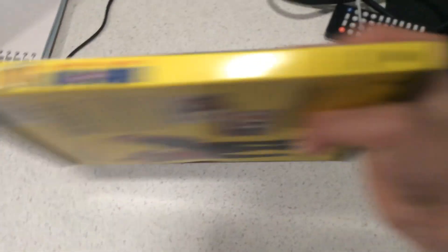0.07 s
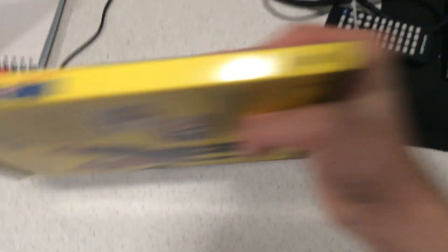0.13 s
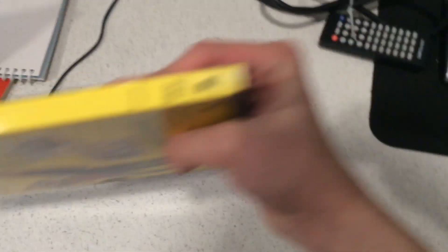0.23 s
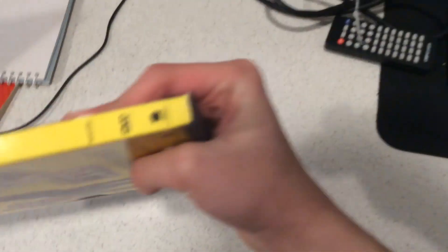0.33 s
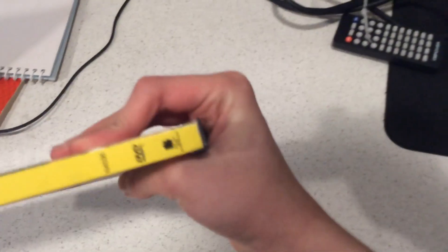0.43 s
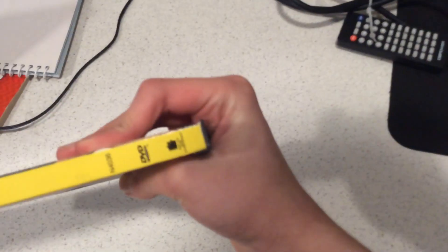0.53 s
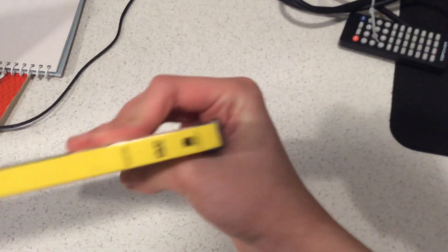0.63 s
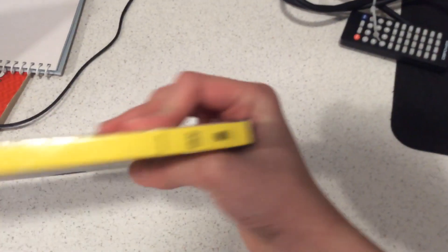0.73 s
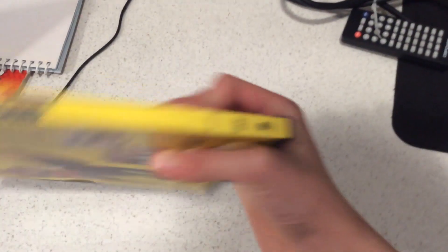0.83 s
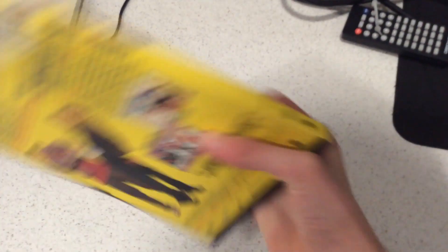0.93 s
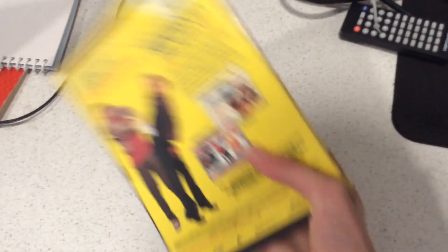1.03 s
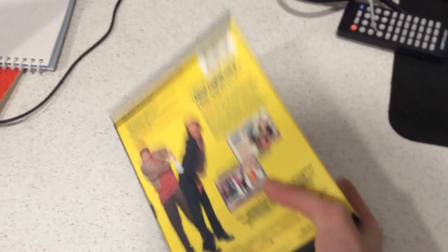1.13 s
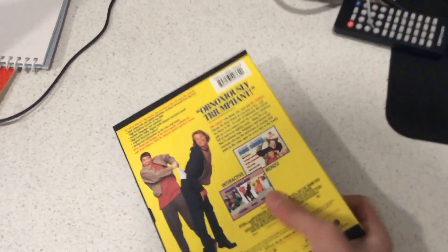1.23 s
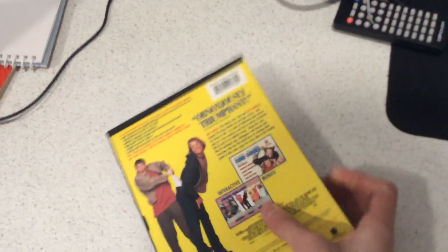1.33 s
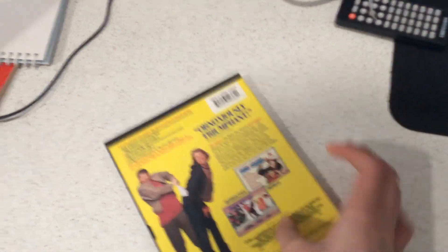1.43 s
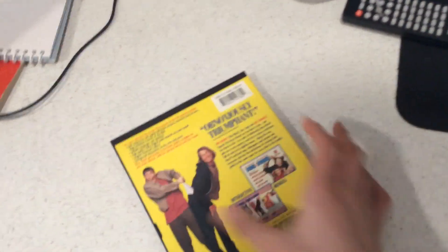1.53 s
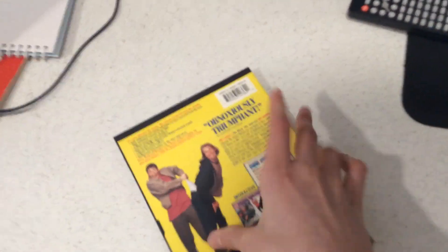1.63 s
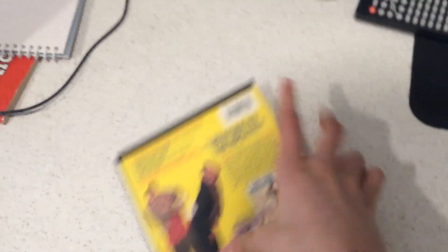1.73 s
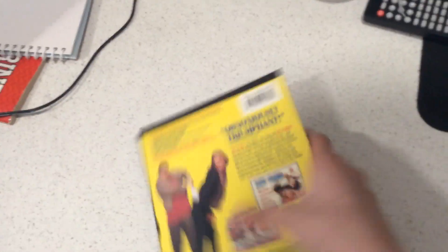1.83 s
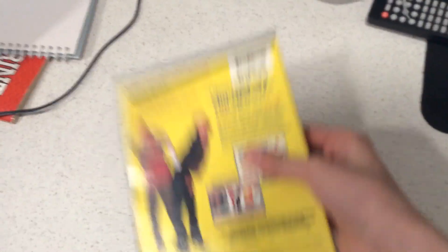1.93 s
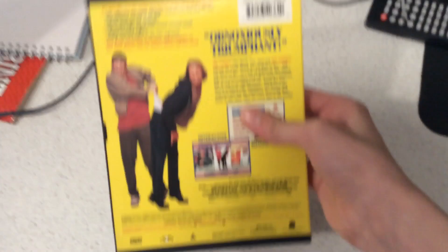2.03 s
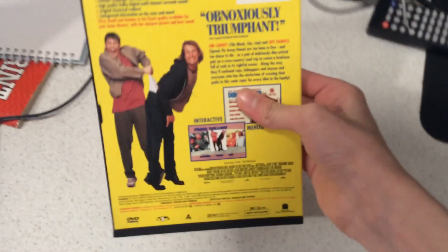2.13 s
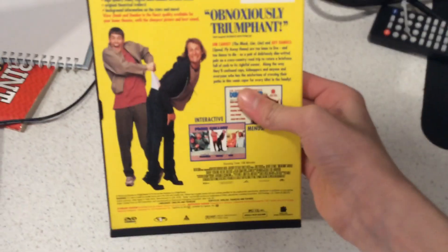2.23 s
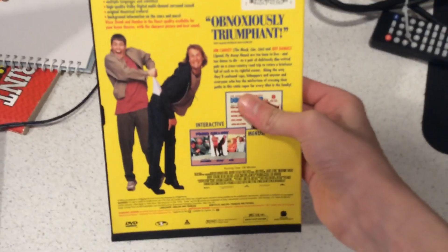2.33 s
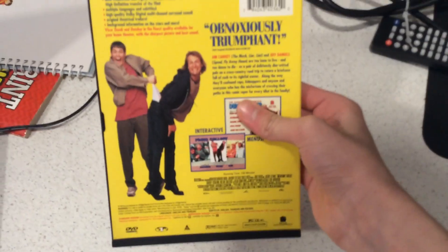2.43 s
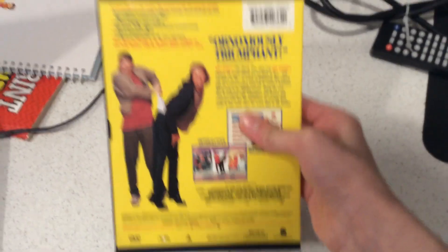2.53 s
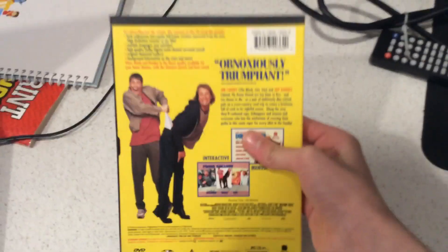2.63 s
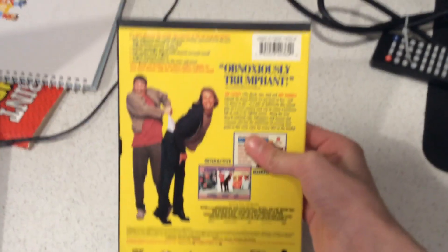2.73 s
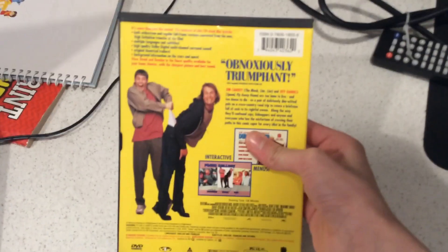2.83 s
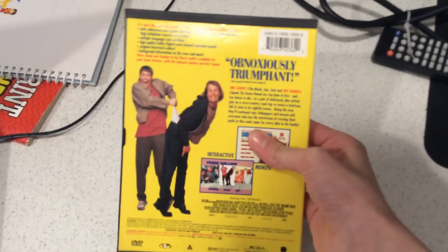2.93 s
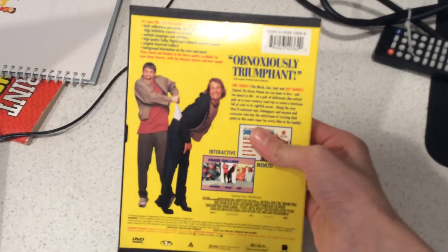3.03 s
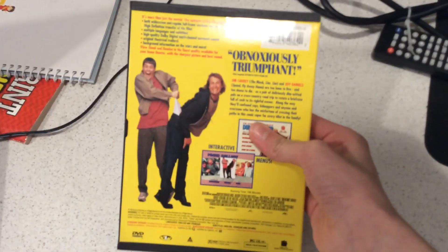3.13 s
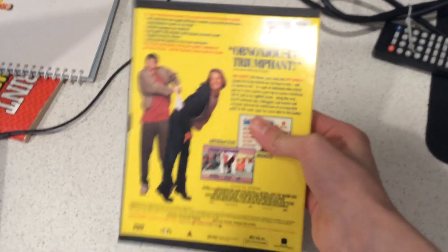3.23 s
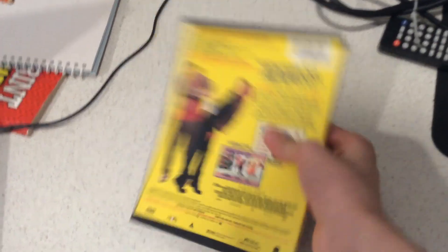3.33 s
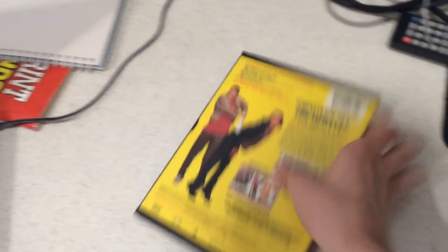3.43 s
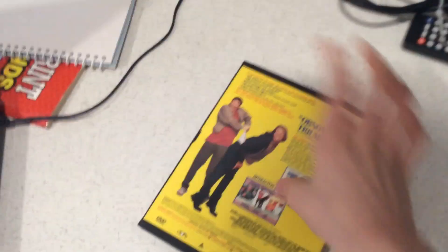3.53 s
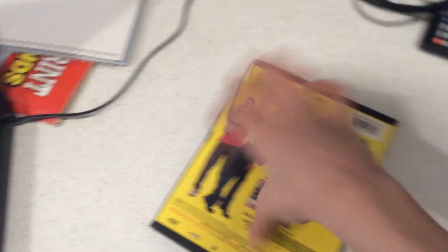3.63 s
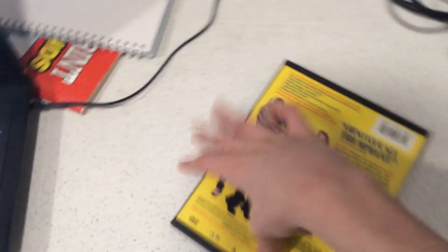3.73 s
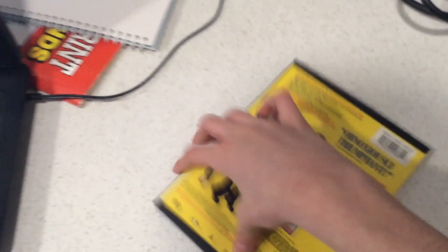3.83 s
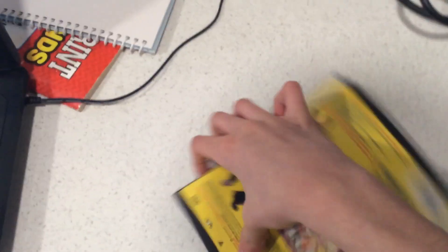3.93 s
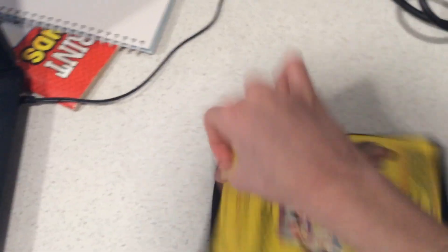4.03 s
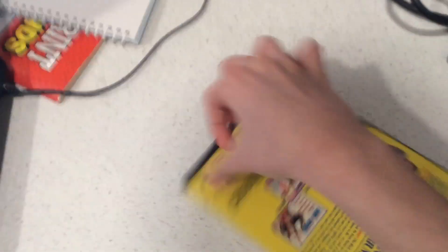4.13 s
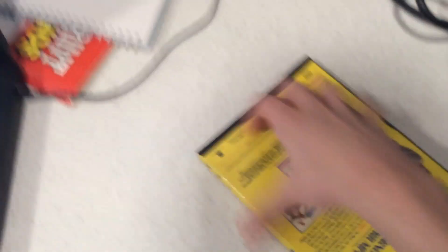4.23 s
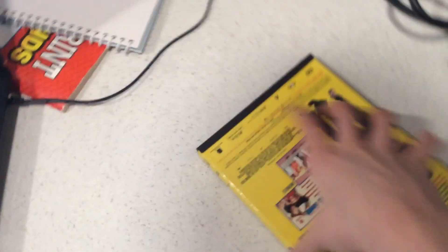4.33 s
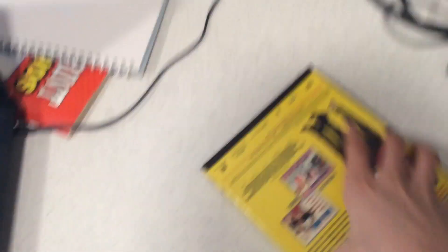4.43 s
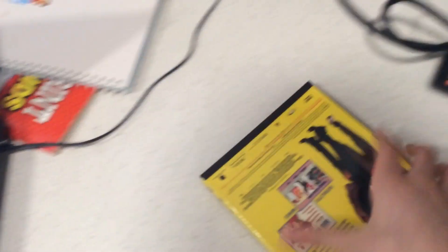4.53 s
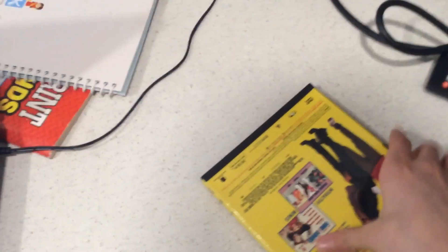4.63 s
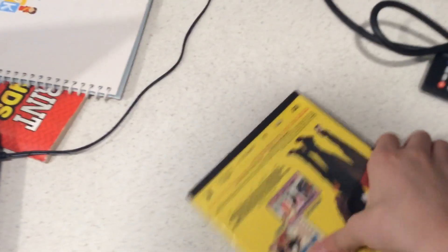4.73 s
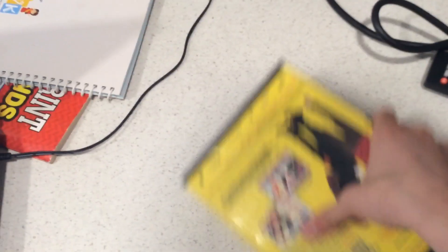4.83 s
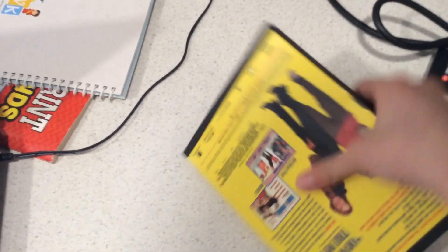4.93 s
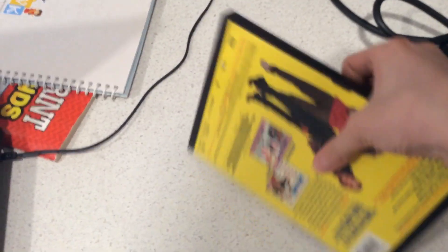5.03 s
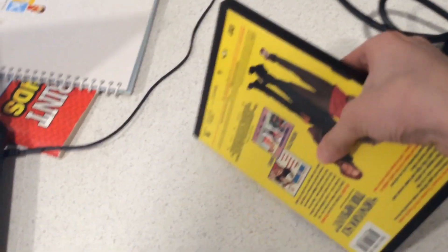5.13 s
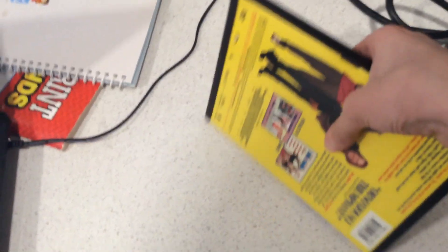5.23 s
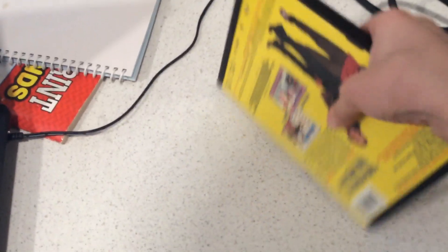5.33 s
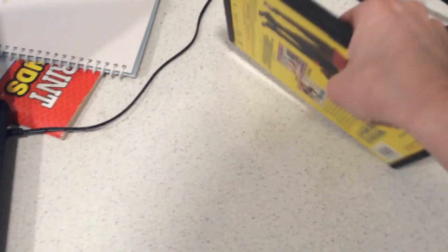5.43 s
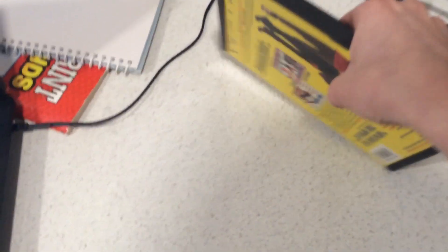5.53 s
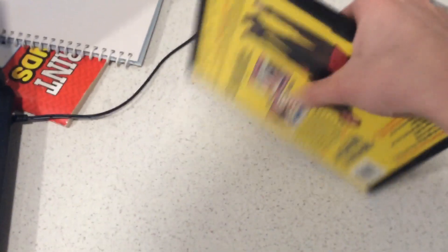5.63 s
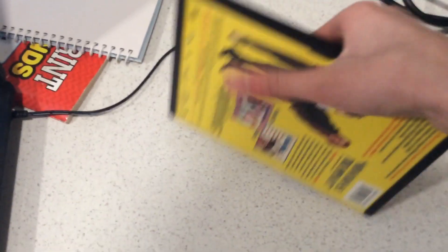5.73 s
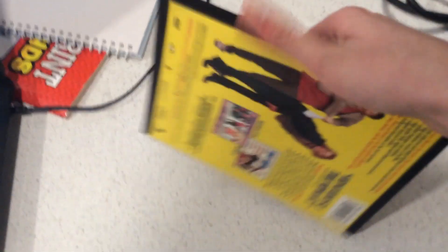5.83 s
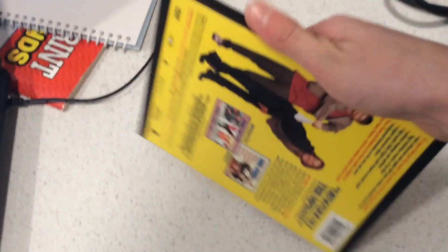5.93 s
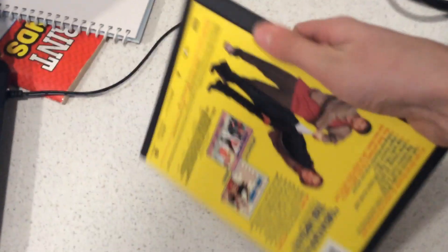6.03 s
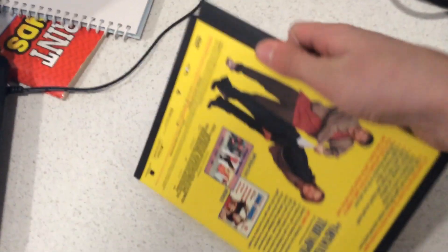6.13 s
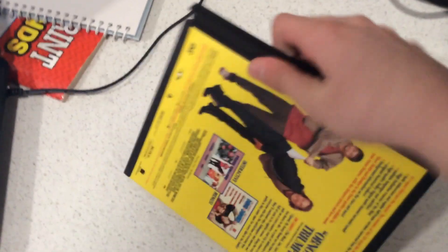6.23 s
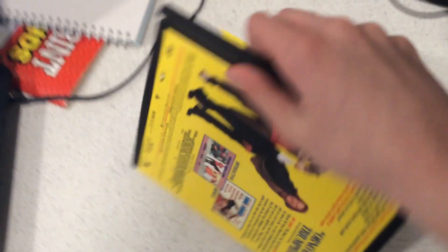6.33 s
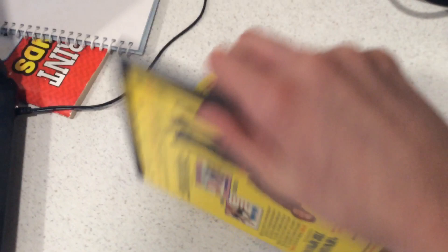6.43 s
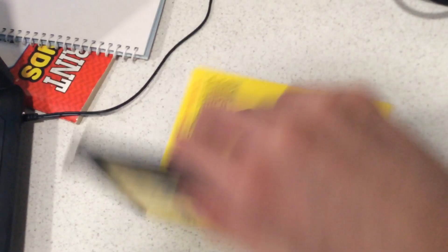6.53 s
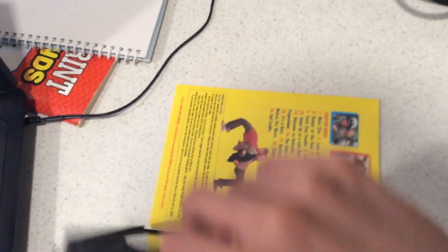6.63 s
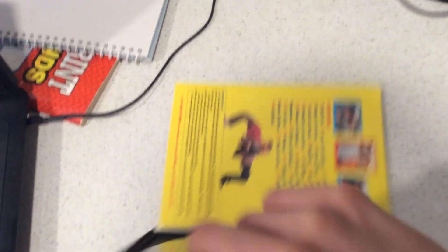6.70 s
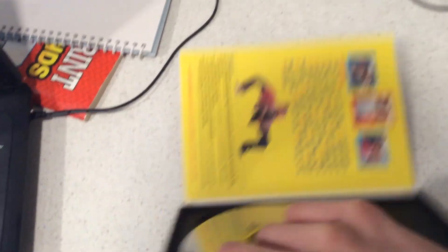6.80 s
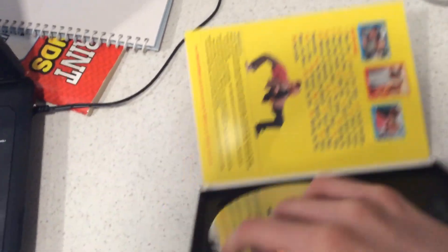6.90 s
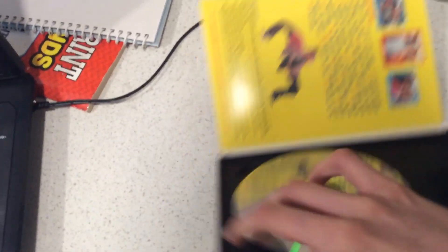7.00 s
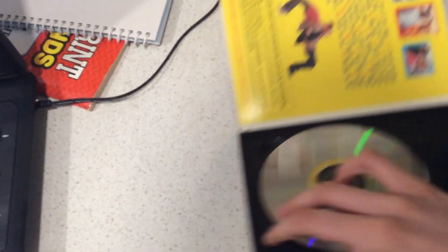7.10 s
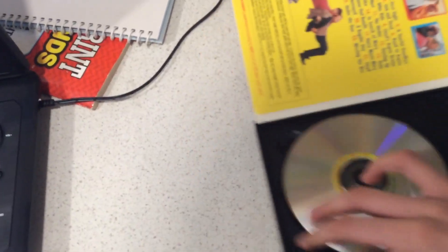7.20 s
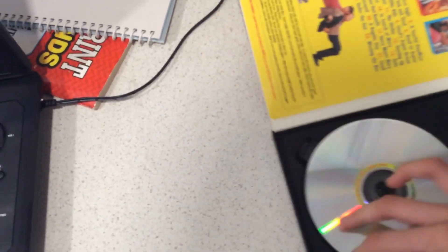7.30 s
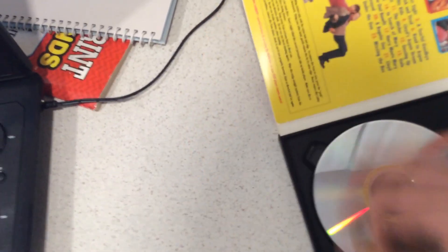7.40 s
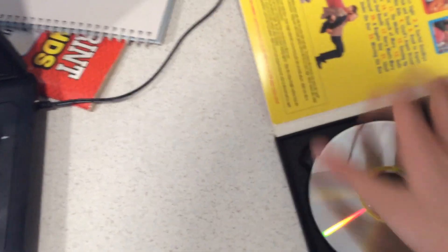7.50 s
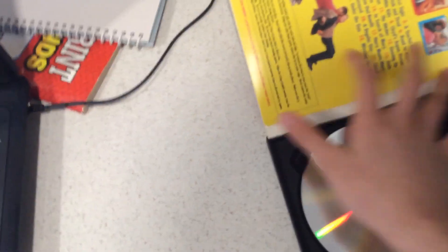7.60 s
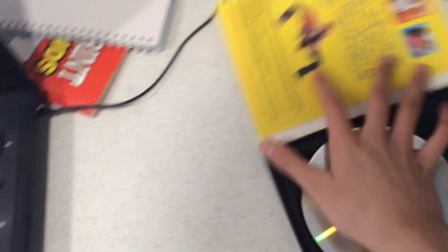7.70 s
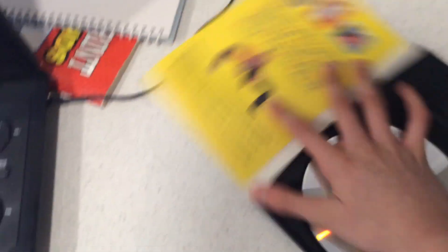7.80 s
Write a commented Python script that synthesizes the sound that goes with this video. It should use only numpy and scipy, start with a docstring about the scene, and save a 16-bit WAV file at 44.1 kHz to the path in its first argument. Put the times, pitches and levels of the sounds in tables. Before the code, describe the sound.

A hand fumbles with a plastic disc case on a hard desk, heard closely with a short dry room echo. Bright catch clicks come in two bursts separated by quiet, then the edge knocks and grinds over the desk. Fingers brush and squeak on the slick cover, the panel flexes with a dull boom, the case pops open, the disc is pressed with a small click, and the case slides.

```python
"""On a desk in a small, quiet room, hands turn over a plastic disc case, pry it open and press the disc on its hub.
Catches and fingertips click: short noise bursts ring through the rim, the hollow shell and the panels.
Fingers hiss and squeak on the sleeve and the edge scrapes the desk: swelling strokes of tiny slips through coloured bodies.
Panels thump in sinking sine modes; soft bumps, low rumble, faint hiss and hum lie underneath."""
import sys
import numpy as np
from scipy import signal
from scipy.fft import rfft, irfft, next_fast_len
from scipy.io import wavfile
from scipy.ndimage import map_coordinates

SR = 44100
rng = np.random.default_rng(int(sys.argv[2]) if len(sys.argv) > 2 else 0)


def transcribe(u):
    """Save the signal u as a 16-bit wav file named by the first command-line argument.

    u: samples, shape (n,) or (channels, n), limited to [-1, 1]; the rate is SR.
    q: integer samples, one column per channel.
    """
    v = np.clip(np.atleast_2d(u).T, -1, 1)
    q = np.round(v * 32767).astype(np.int16)
    wavfile.write(sys.argv[1], SR, q)


N = 346626
LEAD_S = 0.004  # faint grating ahead of each blow
POWER_FLOOR = 1e-14  # keeps logarithms and divisions finite


def amp(db):
    """Amplitude factor of a level in dB."""
    return 10 ** (np.asarray(db) / 20)


def decibels(power):
    """A power as a level in dB."""
    return 10 * np.log10(power + POWER_FLOOR)


def unit(x):
    """Scaled to rms 1."""
    return x / np.sqrt(np.mean(x ** 2) + 1e-20)


def unit_energy(x):
    """Scaled to a sum of squares of 1."""
    return x / (np.linalg.norm(x) + 1e-20)


def along(points, hz):
    """Interpolate (frequency [Hz], value) points on a log frequency axis."""
    f, v = np.transpose(points)
    return np.interp(np.log(hz + 1), np.log(f + 1), v)


def add(track, s, x):
    """Mix x into the track at time s."""
    start = max(0, round(s * SR))
    track[start:start + len(x)] += x[:len(track) - start]


def wobble(rate):
    """A smooth random curve, rate knots a second."""
    knots = rng.standard_normal(int(N * rate / SR) + 4)
    return map_coordinates(knots, [np.arange(N) * rate / SR])


# Resonances of the shell: (frequency [Hz], width [Hz], relative level [dB])
SHELL_MODES = [(603, 120, -5), (1016, 150, -1), (1985, 270, -4.5), (4230, 210, -5), (4650, 200, -5),
               (5090, 210, -5), (8360, 160, -0.5)]


def response(colour, ring_db, size=4096):
    """Causal impulse response of a colour, with the shell's resonances standing out of it; energy 1."""
    hz = np.fft.rfftfreq(size, 1 / SR)
    peaks = sum(amp(db + ring_db) / (1 + (2 * (hz - f) / width) ** 2) for f, width, db in SHELL_MODES)
    # folding the cepstrum gives minimum phase: the energy comes as early as it can
    cepstrum = irfft(np.log(amp(along(colour, hz)) * (1 + peaks)))
    cepstrum[1:size // 2] *= 2
    cepstrum[size // 2 + 1:] = 0
    return unit_energy(irfft(np.exp(rfft(cepstrum))))


def resonance(x, hz, width_hz, gain_db):
    """What a resonance adds to x."""
    ringing = signal.lfilter(*signal.iirpeak(hz, hz / width_hz, SR), x)
    return (amp(gain_db) - 1) * ringing


# Decay of the room: (frequency [Hz], time to fall by 60 dB [s])
ROOM_DECAY = [(120, 0.59), (500, 0.18), (1500, 0.23), (7000, 0.185), (14000, 0.15)]


def room_tail(build_s=0.0035):
    """A fresh noise echo of the room; it builds up softly and each frequency dies at its own speed."""
    hz, t, z = signal.stft(rng.standard_normal(SR // 3), SR, nperseg=256)
    decay = amp(-60 * t / along(ROOM_DECAY, hz)[:, None])
    tail = signal.istft(z * decay, SR, nperseg=256)[1]
    build_up = 1 - np.exp(-(np.arange(len(tail)) / SR / build_s) ** 2)
    return unit_energy(tail * build_up)


def burst(body, t60, chatter_db, lead_db=-17):
    """A faint lead-in, a blow and the rapid chatter after it, ringing through a body; energy 1."""
    t = np.arange(SR // 8) / SR - LEAD_S
    knots = t[::SR // 1000]
    chatter = amp(chatter_db * np.interp(t, knots, rng.standard_normal(len(knots))))
    envelope_db = np.where(t < 0, lead_db * (1 - t / LEAD_S), -60 * t / t60)
    force = rng.standard_normal(len(t)) * chatter * amp(envelope_db)
    # the first push is a single clean spike of force
    force[round(LEAD_S * SR)] += np.linalg.norm(force) / 2
    return unit_energy(signal.fftconvolve(force, body))


def stroke(peak, rise, fall, swing_db=20, curve=1.22):
    """Power of one stroke, 1 at its peak and swing_db lower one rise before and one fall after it."""
    out = np.zeros(N)
    start = max(0, peak - 3 * rise)
    t = np.arange(start, peak + 3 * fall, 1 / SR) - peak
    # a curve above 1 rounds the top and ends the stroke sooner
    distance = np.maximum(-t / rise, t / fall) ** curve
    add(out, start, amp(-swing_db * distance) ** 2)
    return out


def strokes(rows):
    """Summed power of (peak, rise, fall, dB) strokes."""
    return sum(amp(db) ** 2 * stroke(*shape) for *shape, db in rows) + POWER_FLOOR


def friction(level_db, body, slips, smooth_db, room_db):
    """Tiny slips of uneven size (slips a second) over a smooth hiss, heard through a body and the room."""
    slip_times = rng.random(N) < slips / SR
    slip_sizes = amp(3.6 * np.minimum(rng.standard_normal(N), 2))
    grains = slip_times * rng.choice([-1, 1], N) * slip_sizes
    hiss = amp(smooth_db) * rng.standard_normal(N)
    # the contact sticks and lets go, in slow tugs and a quick judder
    judder = amp(1.3 * wobble(35) + 2.2 * wobble(160))
    force = unit((unit(grains) + hiss) * judder)
    direct = signal.fftconvolve(force * amp(level_db), body)[:N]
    return direct + amp(room_db) * signal.fftconvolve(direct, room_tail())[:N]


# Hard snaps of rim and catches:
# (time [s], relative level [dB], hollow clack re the snap [dB], room re each part [dB])
CATCH_SNAPS = [(0.585, -54, -6.5, 0.5), (1.227, -14.5, -4, 0.5), (1.338, -25.5, -4, -8.5),
               (1.492, -16.5, -9.5, -9.5), (1.506, -11, -8, -2), (1.509, -11.5, -14, -9),
               (1.515, -17, -4, -7.5), (1.716, -37, -10.5, -5.5), (1.871, -26, -5.5, 2),
               (1.939, -28.5, -0.5, 1.5), (1.982, -20.5, -10, -14), (2.08, -33.5, -18, -11.5),
               (2.246, -56.5, -24, -2), (3.433, -13, -10.5, -12), (3.463, -14, -10.5, 0),
               (3.493, -19, -3, -4.5), (3.543, -13.5, -10.5, -13), (3.547, -10.5, -12.5, -6.5),
               (3.806, -49.5, -6.5, -1), (5.139, -43, -19, 2), (6.056, -10, -6.5, -5.5),
               (6.239, -32.5, -12, -3), (6.358, -17, -15, -6.5), (7.374, -30.5, -1, -5),
               (7.379, -23, 5, -17.5)]
# The dragged edge catching on the desk in sharp knocks:
# (time [s], relative level [dB], hollow clack re the jolt [dB], room re each part [dB])
EDGE_JOLTS = [(3.994, -22.5, -10, -12), (4.067, -16, -7.5, -22), (4.078, -15, -13, -9),
              (4.09, -14.5, -7.5, -13), (4.278, -17.5, -11, -18), (4.288, -23, -7, -15)]
# Fingertips landing on the panels:
# (time [s], relative knock level [dB], nail's snap re the knock [dB], hollow clack re the knock [dB])
FINGER_TAPS = [(2.591, -70, -1, -1), (2.651, -61, -12, -7.5), (2.73, -70, -4, 1), (4.406, -46, -7, -14),
               (4.432, -52.5, -5, -4), (4.543, -66, 20, 13), (4.699, -54.5, 15, 12.5),
               (4.714, -46.5, 4.5, 5), (4.761, -55, 4.5, 13.5), (4.949, -41, -4, -6), (5.037, -46, 10, 7.5),
               (5.327, -35.5, 2.5, 5.5), (5.514, -29.5, -9.5, -4), (6.314, -30.5, 1.5, 4),
               (6.321, -33.5, 4, 4), (6.784, -50.5, 4, 9.5)]
# Colour of the hard rim: (frequency [Hz], relative level [dB])
RIM_COLOUR = [(1200, -42), (2300, -6.5), (4000, 2), (5400, 2.5), (6800, -8.5), (8600, -6), (12500, -17.5),
              (15500, -41)]
# Colour of the hollow shell: (frequency [Hz], relative level [dB])
CLACK_COLOUR = [(40, -46), (250, -30), (560, 0), (1400, 2.5), (2300, -7.5), (4000, -38)]
# Colour of a knocked panel: (frequency [Hz], relative level [dB])
KNOCK_COLOUR = [(25, -38.5), (110, -1.5), (300, 5), (430, 4.5), (850, -36.5)]


def clicks(snap_t60=0.022, clack_t60=0.047, knock_t60=0.02, gain_db=23.5):
    """Each contact snaps the hard rim or edge, clacks in the hollow shell and knocks the panels."""
    snap_knock_db, tap_room_db = -14.5, -8.5  # knock re the clack; room re each part of a tap
    out = np.zeros(N)
    rim, edge = response(RIM_COLOUR, ring_db=-9.5), response(GRIT_COLOUR, ring_db=-3)
    shell, panel = response(CLACK_COLOUR, ring_db=0.0), response(KNOCK_COLOUR, ring_db=-5.5)
    # each contact: time, hard body, its snap, clack and knock in dB, room in dB
    contacts = []
    for rows, hard in ((CATCH_SNAPS, rim), (EDGE_JOLTS, edge)):
        for s, db, hollow, room_db in rows:
            contacts.append((s, hard, db, db + hollow, db + hollow + snap_knock_db, room_db))
    for s, db, nail, clack in FINGER_TAPS:
        contacts.append((s, rim, db + nail, db + clack, db, tap_room_db))
    for s, hard, *part_db, room_db in contacts:
        tail = room_tail()
        for db, body, t60 in zip(part_db, (hard, shell, panel), (snap_t60, clack_t60, knock_t60)):
            add(out, s - LEAD_S, amp(db + gain_db) * burst(body, t60, chatter_db=5.5))
            # the room takes on the colour of the body
            answer = unit_energy(signal.fftconvolve(tail, body))
            add(out, s, amp(db + gain_db + room_db) * answer)
    return out


# Fingers pressing along the plastic so that it squeaks:
# (peak [s], rise [s], fall [s], relative hiss [dB], squeal at the peak [Hz], relative squeal [dB])
SQUEAK_STROKES = [(5.65, 0.14, 0.14, -44, 5180, -51), (5.83, 0.17, 0.35, -46.5, 5200, -44),
                  (6.0, 0.05, 0.26, -53.5, 5100, -53), (6.17, 0.15, 0.065, -42, 5020, -41),
                  (7.06, 0.078, 0.1, -51, 5300, -37)]
# Firm rubs of the hand, and at 7.38 s the disc's edge scraping as it is pressed; the grip leaves one part of
# the shell free to ring: # (peak [s], rise [s], fall [s], relative scrape [dB], relative hiss [dB], ring [Hz],
# ring gain [dB])
FIRM_RUBS = [(1.835, 0.051, 0.032, -42, -34.5, 1210, 16.5), (1.892, 0.064, 0.058, -38, -32.5, 1130, 18),
             (1.948, 0.056, 0.045, -34, -35.5, 1020, 14.5), (4.61, 0.081, 0.057, -57, -49, 1010, 7),
             (4.909, 0.081, 0.052, -31, -26.5, 1510, 8.5), (5.075, 0.074, 0.045, -45, -38.5, 1580, 7),
             (5.136, 0.013, 0.025, -60, -32.5, 1500, 27.5), (5.47, 0.12, 0.028, -51.5, -30, 1830, 17.5),
             (6.2, 0.17, 0.12, -44.5, -42, 1290, 4.5), (6.39, 0.04, 0.11, -47.5, -43.5, 900, 1),
             (6.505, 0.042, 0.078, -51, -40.5, 1370, -8), (6.804, 0.043, 0.11, -50.5, -32, 676, 10),
             (6.863, 0.091, 0.062, -49.5, -29, 1500, 19), (7.065, 0.13, 0.11, -47, -34, 460, 8.5),
             (7.17, 0.21, 0.19, -46, -43, 1050, 6.5), (7.38, 0.014, 0.072, -39, -36.5, 1330, 13)]
# Colour of the sleeve: (frequency [Hz], relative level [dB])
SLEEVE_COLOUR = [(1300, -32), (2500, -7.5), (4000, -2.5), (5100, 0), (6300, -10), (7600, -17), (8400, -8.5),
                 (10500, -17), (14500, -32.5)]
# Colour of the shell under a firm rub: (frequency [Hz], relative level [dB])
SCUFF_COLOUR = [(40, -49), (250, -7.5), (520, -5.5), (750, 1), (1050, -1), (1600, -3), (2400, -4.5),
                (4000, -27)]
# Resonance of the seam: (frequency [Hz], width [Hz], gain [dB])
SEAM_RESONANCE = (4490, 100, 11)


def rubbing(squeak_scrape_db=-14, ring_q=5.26):
    """Firm fingers hiss over the sleeve, ring the seam and scrape the shell, whose free part rings."""
    squeaks = strokes([row[:4] for row in SQUEAK_STROKES])
    rubs = [(stroke(s, rise, fall), *rest) for s, rise, fall, *rest in FIRM_RUBS]
    hiss_power = squeaks + sum(amp(db) ** 2 * swell for swell, _, db, _, _ in rubs)
    scrape_power = amp(squeak_scrape_db) ** 2 * squeaks
    scrape_power = scrape_power + sum(amp(db) ** 2 * swell for swell, db, _, _, _ in rubs)
    sleeve_body, shell_body = response(SLEEVE_COLOUR, ring_db=-10.5), response(SCUFF_COLOUR, ring_db=-4.0)
    sleeve = friction(decibels(hiss_power), sleeve_body, slips=450, smooth_db=1.5, room_db=-10.5)
    shell = friction(decibels(scrape_power), shell_body, slips=260, smooth_db=3.5, room_db=-8.0)
    shell = shell + flexing(scrape_power)
    rings = np.zeros(N)
    for swell, db, _, hz, ring_db in rubs:
        # each stroke rings its own share of the sound
        share = swell * amp(db) ** 2 / scrape_power
        rings += resonance(shell * share, hz, hz / ring_q, ring_db)
    seam = resonance(sleeve * squeaks / hiss_power, *SEAM_RESONANCE)
    return sleeve + shell + rings + seam


def squealing(width_rate=220, sag_hz_per_s=700):
    """Skin sticks and slips on the plastic: a rough, narrow squeal that sinks through each stroke."""
    out, t = np.zeros(N), np.arange(N) / SR
    # the faster this random modulation, the wider the squeal's band
    roughness = wobble(width_rate) + 1j * wobble(width_rate)
    for s, rise, fall, _, hz, db in SQUEAK_STROKES:
        phase = 2 * np.pi * np.cumsum(hz - sag_hz_per_s * (t - s)) / SR
        swell = np.sqrt(stroke(s, rise, fall))
        out += amp(db) * swell * np.real(roughness * np.exp(1j * phase))
    return out


# The case dragged over the desk:
# (peak [s], rise [s], fall [s], relative scrape [dB], relative grit [dB], hollow ring gain [dB])
DESK_DRAGS = [(1.41, 0.095, 0.11, -42.5, -45, 0.5), (3.485, 0.044, 0.049, -31, -24.5, -1),
              (3.859, 0.024, 0.039, -47.5, -48.5, 12.5), (3.924, 0.066, 0.056, -42, -37.5, 8),
              (4.008, 0.023, 0.03, -28, -24.5, 0.5), (4.108, 0.064, 0.17, -27, -20.5, 4),
              (7.787, 0.047, 0.16, -28.5, -40, 14), (7.845, 0.088, 0.11, -28.5, -24, 8.5)]
# Colour of grit under the edge, also of its jolts: (frequency [Hz], relative level [dB])
GRIT_COLOUR = [(1300, -29), (2500, -7), (4000, 0), (5200, 2.5), (6500, -12), (8400, -12.5), (10000, -22),
               (13000, -57)]
# Colour of the scraped shell, also under light slides: (frequency [Hz], relative level [dB])
SCRAPE_COLOUR = [(40, -46), (250, -22), (500, -6.5), (1200, 3.5), (1650, 1), (2300, -6), (4000, -40)]
# Resonances of the case lying on the desk: (frequency [Hz], width [Hz], gain re the hollow ring [dB])
LYING_CASE_MODES = [(820, 67, -2), (1030, 110, -5), (1176, 170, -3)]


def dragging():
    """The case grinds over the desk: grit under its edge, and a scrape that rings in the hollow shell."""
    drags = [(stroke(s, rise, fall), *rest) for s, rise, fall, *rest in DESK_DRAGS]
    grit_power = sum(amp(db) ** 2 * swell for swell, _, db, _ in drags)
    scrape_power = sum(amp(db) ** 2 * swell for swell, db, _, _ in drags) + POWER_FLOOR
    # the ring gain is averaged over the drags, weighted by their scrape power
    hollow_db = sum(ring_db * amp(db) ** 2 * swell for swell, db, _, ring_db in drags) / scrape_power
    grit_body, scrape_body = response(GRIT_COLOUR, ring_db=-11.0), response(SCRAPE_COLOUR, ring_db=-1.5)
    grit = friction(decibels(grit_power), grit_body, slips=460, smooth_db=3.5, room_db=-8.5)
    scrape = friction(decibels(scrape_power), scrape_body, slips=250, smooth_db=2.0, room_db=-9.0)
    hollow = sum(resonance(scrape, hz, width, hollow_db + db) for hz, width, db in LYING_CASE_MODES)
    return grit + scrape + hollow + flexing(scrape_power, flex_db=-40.5)


# Fingers sliding lightly over the sleeve: (peak [s], rise [s], fall [s], relative hiss level [dB])
LIGHT_SLIDES = [(0.29, 0.24, 0.22, -60.5), (0.485, 0.095, 0.057, -46.5), (0.89, 0.2, 0.5, -49),
                (1.11, 0.1, 0.055, -53), (2.08, 0.15, 0.13, -47.5), (2.65, 0.12, 0.19, -70.5),
                (3.39, 0.093, .06, -63), (3.77, 0.35, 0.19, -63.5), (4.35, 0.07, 0.22, -44),
                (4.98, 0.19, 0.27, -40.5), (6.84, 0.28, 0.26, -42.5), (7.81, .1, 0.27, -33.5)]
# Colour of a light slide: (frequency [Hz], relative level [dB])
BRUSH_COLOUR = [(700, -40), (2400, -14.5), (3600, -7), (5100, -0.5), (6500, -7), (7500, -11), (9000, -7),
                (11500, -13), (15500, -35)]


def sliding(scrape_db=-17):
    """Fingers brush over the sleeve with a smooth, airy hiss; the loosely held shell answers faintly."""
    level_db = decibels(strokes(LIGHT_SLIDES))
    shell_db = level_db + scrape_db
    brush_body, shell_body = response(BRUSH_COLOUR, ring_db=-15), response(SCRAPE_COLOUR, ring_db=-3.0)
    brush = friction(level_db, brush_body, slips=300, smooth_db=18.0, room_db=-16.0)
    shell = friction(shell_db, shell_body, slips=140, smooth_db=5, room_db=-8.5)
    return brush + shell + flexing(amp(shell_db) ** 2, flex_db=-41.5)


# Colour of the flexing panels: (frequency [Hz], relative level [dB])
FLEX_COLOUR = [(25, -30), (100, -1.5), (250, 4), (420, 8), (850, -21)]


def flexing(scrape_power, flex_db=-35.0, flex_growth=0.41, rest_db=-72):
    """The harder the shell is scraped, the more its panels flex; below rest_db they fade out."""
    scrape_db = decibels(scrape_power)
    level_db = flex_db + flex_growth * scrape_db
    body = response(FLEX_COLOUR, ring_db=-4.5)
    flex = friction(level_db, body, slips=140, smooth_db=6.5, room_db=-11.5)
    return flex * np.clip(amp(scrape_db - rest_db), 0, 1)


def desk_bounce(x, delay_s=0.001413, drift=0.099):
    """The desk returns a close, dull copy; its delay drifts at random, so the comb of both paths shifts."""
    dull = signal.sosfilt(signal.butter(1, 2200, fs=SR, output="sos"), x)
    delay = SR * delay_s * (1 + drift * wobble(4.6))
    echo = map_coordinates(dull, [np.arange(N) - delay])
    return .96 * (x + .4 * echo)


# The wide panel flexing in and out with a hollow thump:
# (time [s], relative level [dB], starting pitch [Hz], attack time constant [s])
PANEL_THUMPS = [(5.515, -28, 282, 0.0017), (5.575, -28.5, 252, 0.0088)]
# Modes of the panel: (multiple of the pitch, relative level [dB])
THUMP_MODES = [(1, -6), (1.4, -10.5), (1.95, -8.5)]


def thumps(t60=0.14, sag_hz_per_s=230, rattle_db=3.5):
    """The flexed panel booms in its lowest modes, ringing unevenly; the pitch sinks as it relaxes."""
    out, t = np.zeros(N), np.arange(SR // 3) / SR
    for s, db, hz, attack in PANEL_THUMPS:
        phase = 2 * np.pi * np.cumsum(hz - sag_hz_per_s * t) / SR
        ring = np.zeros(len(t))
        for multiple, mode_db in THUMP_MODES:
            rattle = rattle_db * wobble(160)[:len(t)]
            ring += amp(mode_db + rattle) * np.sin(multiple * phase)
        add(out, s, amp(db - 60 * t / t60) * (1 - np.exp(-t / attack)) * ring)
    return out


# Soft bumps of hand and case on the desk: (time [s], relative level [dB])
SOFT_BUMPS = [(0.153, -64.5), (0.94, -51.5), (1.241, -44), (1.505, -55), (4.429, -48), (4.707, -44),
              (6.072, -38.5), (6.308, -40.5)]
# Colour of the bumped desk: (frequency [Hz], relative level [dB])
THUD_COLOUR = [(20, -25.5), (58, -3.5), (110, 2.5), (170, -7), (400, -42.5)]


def bumps(t60=0.081, gain_db=29):
    """Soft, heavy contacts make only a low thud."""
    out, desk = np.zeros(N), response(THUD_COLOUR, ring_db=-11.5)
    for s, db in SOFT_BUMPS:
        add(out, s - LEAD_S, amp(db + gain_db) * burst(desk, t60, chatter_db=1.0))
    return out


# The case swung through the air: (peak [s], rise [s], fall [s], relative level [dB])
AIR_SWINGS = [(0.15, 0.14, 0.24, -58.5), (0.8, 0.34, 0.16, -62), (4.75, 0.066, 0.33, -58),
              (5.45, 0.37, 0.34, -61.5)]
# Colour of the stirred air: (frequency [Hz], relative level [dB])
RUMBLE_COLOUR = [(20, -8.5), (50, 5.5), (150, -7), (450, -33.5)]


def swings():
    """The case swung through the air stirs a low rumble."""
    body = response(RUMBLE_COLOUR, ring_db=-13)
    return friction(decibels(strokes(AIR_SWINGS)), body, slips=27, smooth_db=8.0, room_db=-6.5)


# Colour of the still room's hiss: (frequency [Hz], relative level [dB])
QUIET_COLOUR = [(25, -24), (70, -7), (250, -12.5), (550, -20), (1200, -27), (3000, -31), (5000, -27.5),
                (7000, -35.5), (8500, -24.5), (13000, -31), (15500, -37)]


def room_tone(hum_hz=57, hum_db=-78, hiss_db=-70.5):
    """Faint steady hiss of coloured noise and a low hum, wavering in phase and level."""
    colour = amp(along(QUIET_COLOUR, np.fft.rfftfreq(N, 1 / SR)))
    hiss = irfft(rfft(rng.standard_normal(N)) * colour, N)
    phase = 2 * np.pi * hum_hz * np.arange(N) / SR + .6 * wobble(4.1)
    hum = np.sin(phase) * amp(3.5 * wobble(4.6))
    return amp(hiss_db) * unit(hiss) + amp(hum_db) * unit(hum)


def scene():
    """The handled case, the desk under it and the still room."""
    handling = desk_bounce(rubbing() + dragging() + sliding())
    mix = clicks() + handling + squealing() + thumps() + bumps() + swings() + room_tone()
    return mix[None]


def record(dry, top_hz=15300):
    """Peaks beyond full scale are clipped; the treble then ends steeply at the band limit."""
    size = next_fast_len(N + SR // 2)
    passed = 1 / (1 + (np.fft.rfftfreq(size, 1 / SR) / top_hz) ** 60)
    return irfft(rfft(np.clip(dry, -1, 1), size) * passed, size)[:, :N]


dry = scene()
out = record(dry)
transcribe(out)
```